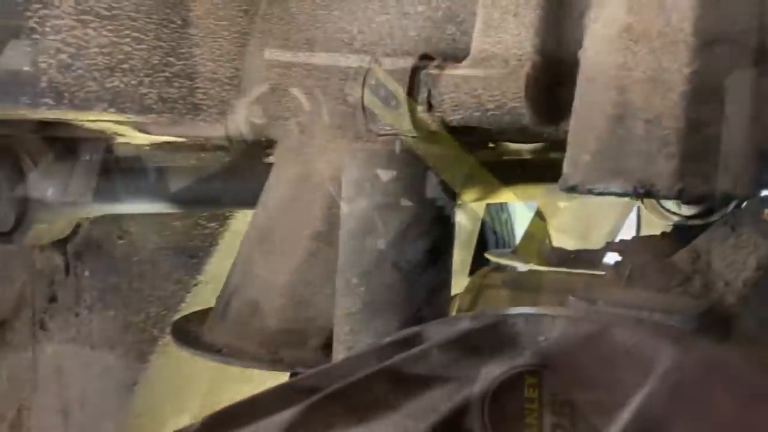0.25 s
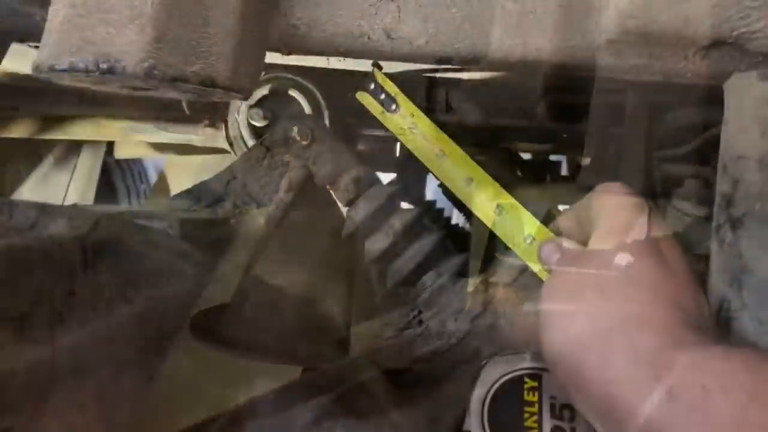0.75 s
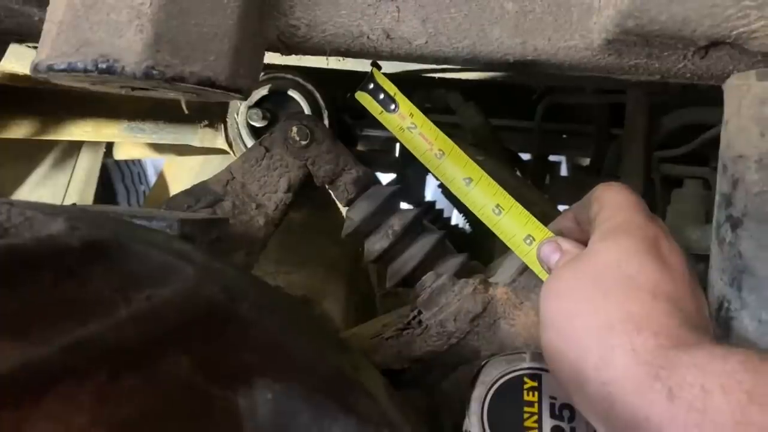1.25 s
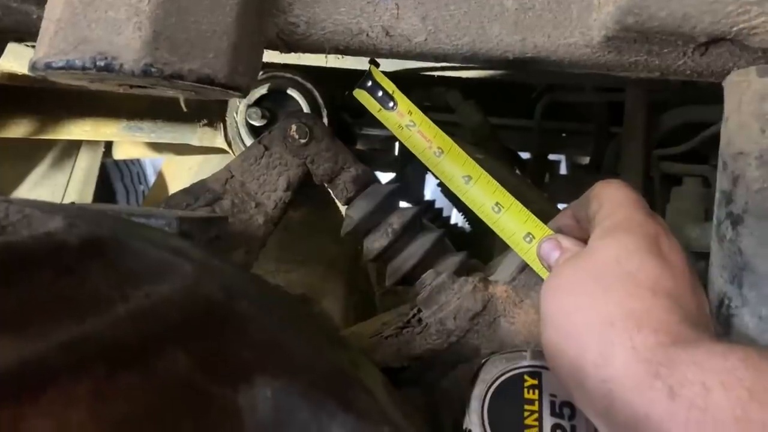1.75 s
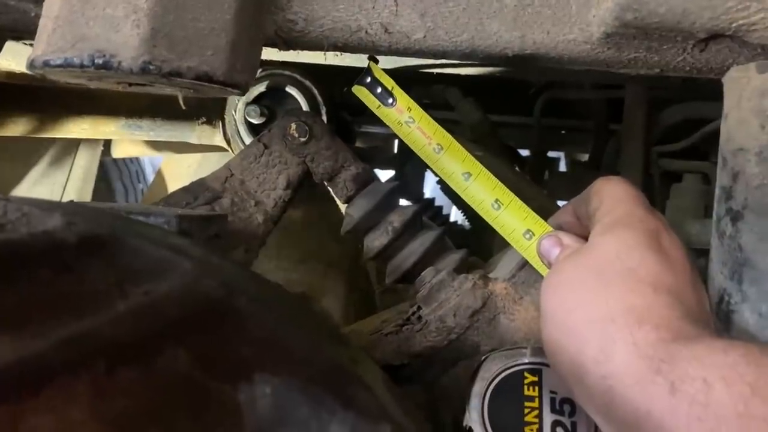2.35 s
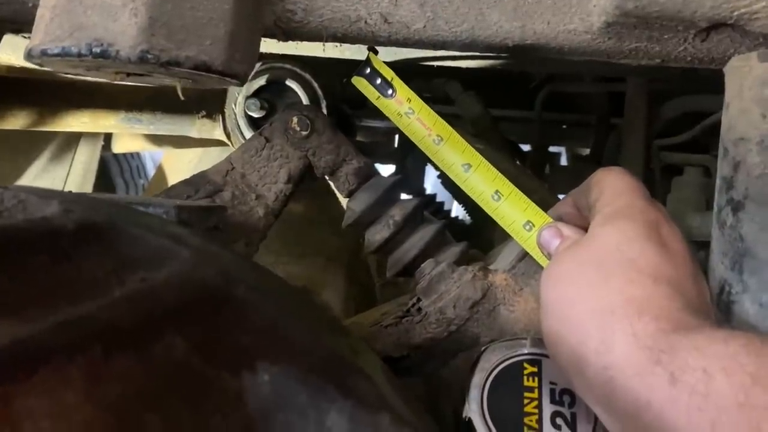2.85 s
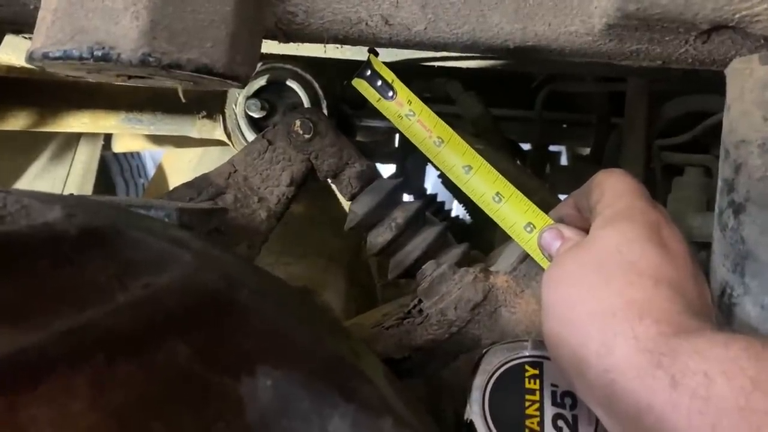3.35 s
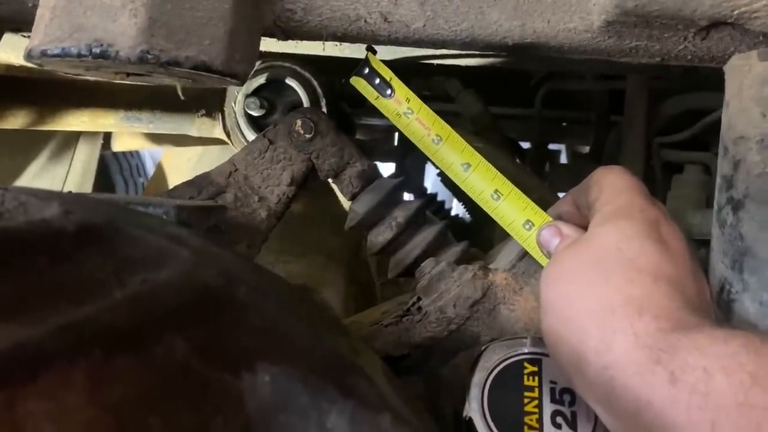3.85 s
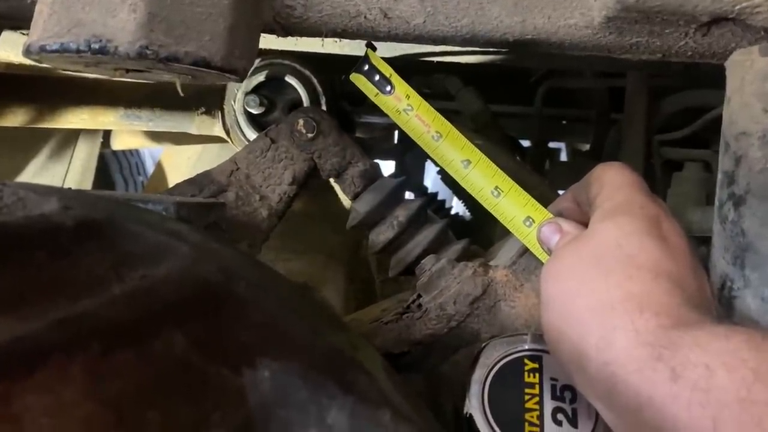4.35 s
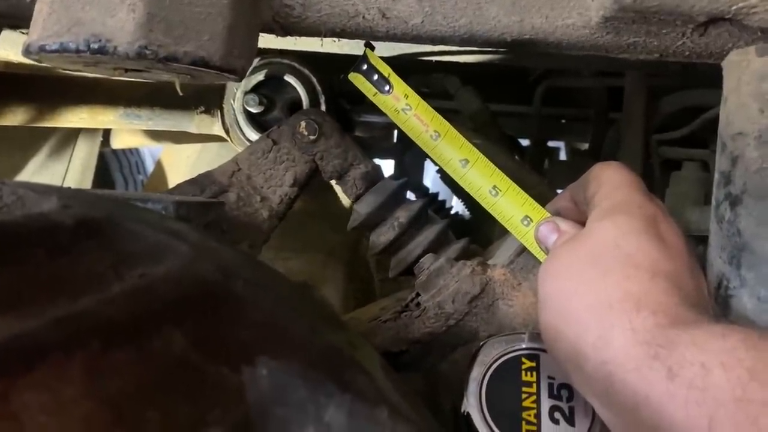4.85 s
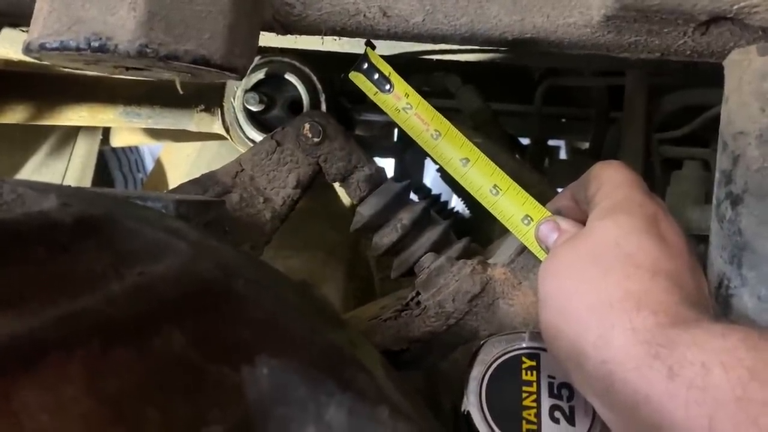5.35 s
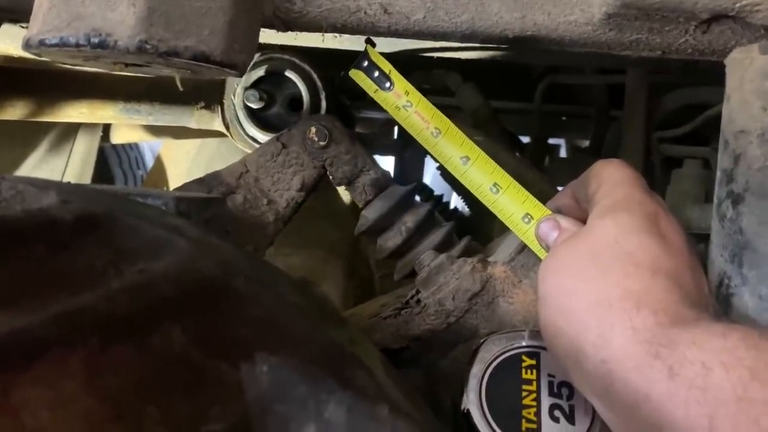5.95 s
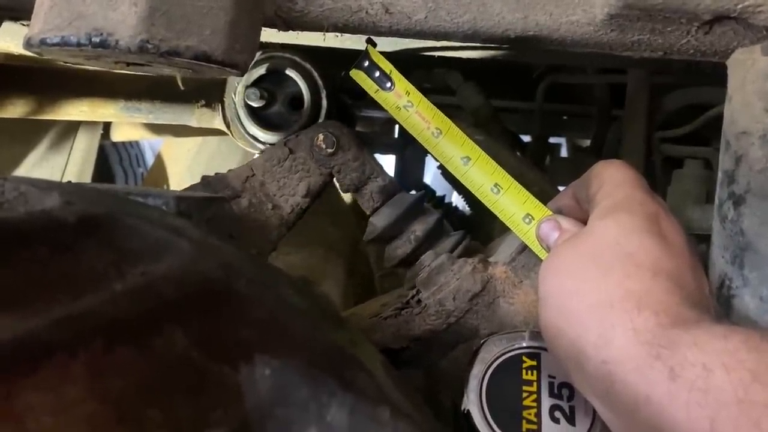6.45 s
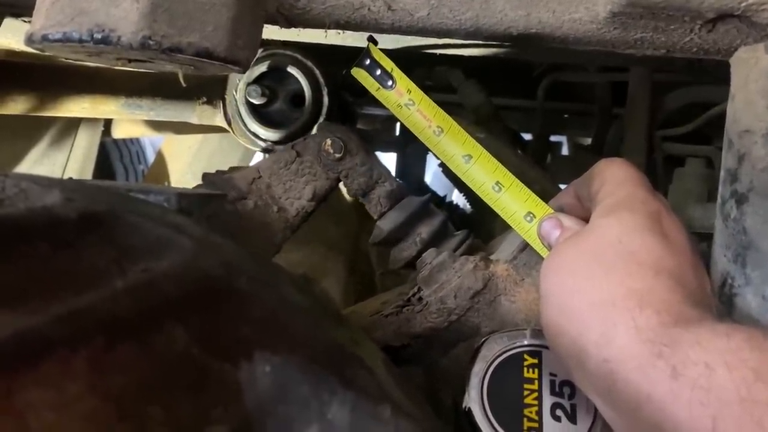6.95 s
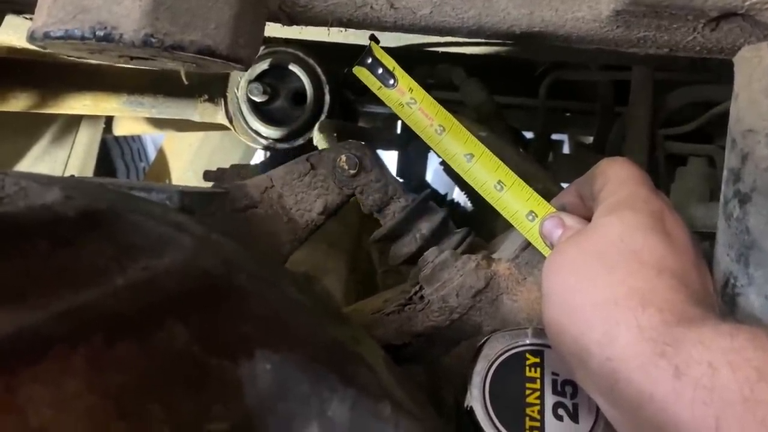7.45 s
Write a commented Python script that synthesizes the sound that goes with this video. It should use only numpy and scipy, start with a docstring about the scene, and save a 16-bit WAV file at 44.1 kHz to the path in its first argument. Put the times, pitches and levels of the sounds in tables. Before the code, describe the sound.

Engine idles with low drone and clatter; a brake air valve clicks open, dumps air in a fierce dulling hiss, puffs once, leaks faintly.

```python
"""Workshop: under an idling vehicle an air valve ticks, opens and dumps its air in a loud hiss.
Shaped noise makes the jet, which dulls as the pressure falls; a low rumble buffets the microphone,
a last puff escapes and a thin leak remains. Exhaust orders and cyclic knocks make the engine.
A gain control ducks under the blast and slowly brings the engine back."""
import sys
import numpy as np
from scipy import signal
from scipy.fft import rfft, irfft, next_fast_len
from scipy.io import wavfile
from scipy.ndimage import map_coordinates

SR = 44100
rng = np.random.default_rng(int(sys.argv[2]) if len(sys.argv) > 2 else 0)


def master_out(mix):
    """Clip the mix to full scale and print it as 16-bit PCM to the path in sys.argv[1]."""
    frames = np.transpose(np.atleast_2d(mix))
    ceiling = np.clip(frames, -1, 1)
    pcm = np.round(ceiling * 32767).astype(np.int16)
    wavfile.write(sys.argv[1], SR, pcm)


N = 339129
TIME = np.arange(N) / SR


def amp(db):
    """Decibels to gain."""
    return 10 ** (np.asarray(db) / 20)


def unit(x):
    """Scale to rms 1."""
    return x / np.sqrt(np.mean(x ** 2) + 1e-20)


def along(points, hz):
    """(hz, value) points joined on a log axis."""
    point_hz, value = np.transpose(points)
    return np.interp(np.log(hz + 1), np.log(point_hz + 1), value)


def curves(rows, t=TIME):
    """Each column after the time, read at the times t."""
    time_s, *columns = np.transpose(rows)
    return [np.interp(t, time_s, column) for column in columns]


def wobble(rate_hz):
    """A smooth random curve with rate_hz knots a second."""
    knots = rng.standard_normal(int(N * rate_hz / SR) + 4)
    return map_coordinates(knots, [TIME * rate_hz])


def filtered(x, response):
    """x times a response of frequency."""
    size = next_fast_len(N + 8192)
    spectrum = rfft(x, size) * response(np.fft.rfftfreq(size, 1 / SR))
    return irfft(spectrum, size)[..., :N]


def coloured(x, spectrum):
    """x with the given (hz, db) colour, at rms 1."""
    return unit(filtered(x, lambda hz: amp(along(spectrum, hz))))


def noise():
    """Fresh white noise."""
    return rng.standard_normal(N)


def lift(resonances, hz):
    """The dB that Gaussian (centre_hz, half_width_hz, lift_db) resonances add."""
    return sum(db * np.exp(-((hz - centre) / width) ** 2) for centre, width, db in resonances)


def since(start_s, t=TIME):
    """Seconds gone by since start_s, zero before it."""
    return np.maximum(t - start_s, 0)


def swell(full_s, end_s, rise_db, sag_db, fall_db):
    """Envelope in dB: rises until full_s, sags, falls further from end_s; slopes in dB per second."""
    return -rise_db * np.maximum(full_s - TIME, 0) - sag_db * since(full_s) - fall_db * since(end_s)


def chassis(x, t60_s, wet_db):
    """Dense reflections from frame and floor comb the sound and give it a short tail."""
    t = np.arange(SR // 4) / SR
    tail = rng.standard_normal(len(t)) * amp(-60 * t / t60_s) * (t > .002)
    return x + amp(wet_db) * signal.fftconvolve(x, tail / np.linalg.norm(tail))[:N]


# room background colour: hz, relative_db
ROOM_COLOUR = [(25, -32), (45, -16), (75, -8), (110, 3), (220, -13), (500, -15), (1000, -12), (4000, -17.5),
               (12000, -46), (16000, -62)]


def workshop(room_db, hum_db):
    """Room rumble and a 120 Hz mains hum that beats against the engine."""
    hum = np.sin(2 * np.pi * 120 * TIME)
    return amp(room_db) * coloured(noise(), ROOM_COLOUR) + amp(hum_db) * unit(hum)


CYCLE_HZ = 28.55  # mean engine cycle rate
# engine level: time_s, exhaust_db, clatter_db
IDLE_LEVELS = [(0, -33, -37), (.3, -35, -40.5), (.55, -37.5, -42.5), (1, -34.5, -39), (1.5, -34, -38.5),
               (2.1, -33.5, -37), (3.5, -35, -36), (5.5, -33.5, -38.5), (7.69, -32, -37.5)]
# exhaust harmonics of the cycle: order, relative_db
EXHAUST_ORDERS = [(1, -38), (2, 0.5), (3, -20.5), (4, -14.5), (5, -20), (6, -13), (7, -29), (8, -23.5),
                  (9, -32), (10, -27), (11, -23), (12, -8.5), (13, -20), (14, -11.5), (15, -11), (16, -14),
                  (17, -21.5), (18, -13), (19, -15.5), (20, -15.5), (21, -18.5), (22, -34), (23, -28),
                  (24, -24.5)]
# mechanical clatter colour: hz, relative_db
CLATTER_COLOUR = [(400, -12.5), (650, -5.5), (800, -12.5), (1100, -2), (1500, -3.5), (2000, -4), (2800, -6),
                  (4300, -13), (5400, -20), (8000, -21), (13000, -22.5), (15500, -33)]
# ringing of engine block and covers: centre_hz, half_width_hz, lift_db
BLOCK_MODES = [(993, 24, 9), (1101, 22, 8.5), (1447, 32, 8), (1604, 16, 7.5), (2460, 79, 8), (3330, 160, 5),
               (4250, 200, 2.5), (6470, 620, 4.5), (10200, 250, 4.5)]


def engine(waver_db, loose_db, throb, smear):
    """Two firings a cycle: low exhaust orders, and clatter that partly repeats with every turn."""
    turns = np.cumsum(CYCLE_HZ * (1 + 0.00078 * wobble(5))) / SR
    exhaust_db, clatter_db = curves(IDLE_LEVELS)
    drone = 0
    for order, db in EXHAUST_ORDERS:
        steadiness = .3 if order == 2 else 1  # firing order wavers least
        # silencer and walls smear each pulse into a ragged falling sweep
        lead = smear * order ** 2 + rng.normal(0, 0.12)
        level = amp(db + steadiness * waver_db * wobble(7))
        drone = drone + level * np.sin(2 * np.pi * (order * turns + lead))
    # same knocks each cycle, loose rattle on top
    size = round(SR / CYCLE_HZ / 2)
    one_turn = unit(irfft(np.exp(2j * np.pi * rng.random(size))))
    knocks = map_coordinates(one_turn, [turns % 1 * len(one_turn)], mode="grid-wrap")
    knocks = filtered(knocks, lambda hz: 1 / (1 + (hz / 2000) ** 4))
    firing = 1 + throb * np.cos(2 * np.pi * 2 * turns)
    blows = (knocks + amp(loose_db) * noise()) * firing
    clatter = filtered(blows, lambda hz: amp(along(CLATTER_COLOUR, hz) + lift(BLOCK_MODES, hz)))
    return amp(exhaust_db) * unit(drone) + amp(clatter_db) * unit(clatter)


# valve tick: start_s, level_db
TICK_EVENT = (1.9218, -30.3)
# steel valve modes: pitch_hz, relative_db, t60_s
VALVE_MODES = [(6487, -2, 0.042), (6900, 7, 0.04), (7784, -15, 0.061), (11000, -12, 0.05),
               (11700, -7, 0.051), (14840, -20, 0.045)]


def tick(crack_db, crack_t60_s):
    """The valve unseats: a sharp crack and a brief steel ring."""
    start_s, level_db = TICK_EVENT
    t = since(start_s)
    ring = sum(amp(db - 60 * t / t60_s) * np.sin(2 * np.pi * hz * t) for hz, db, t60_s in VALVE_MODES)
    crack = coloured(noise(), [(3500, -30), (5200, -8), (7000, 8.5), (8500, -6), (12500, -11), (16000, -26)])
    onset = 1 - np.exp(-t / 0.00049)
    blow = (ring + crack * amp(crack_db - 60 * t / crack_t60_s)) * onset
    return chassis(amp(level_db) * blow, t60_s=0.073, wet_db=-14)


# moving-air rumble colour: hz, relative_db
BUFFET_COLOUR = [(30, -25), (80, -15), (180, -1.5), (260, -12), (550, -8), (800, -16.5), (1300, -27),
                 (3000, -26)]
# gusts thumping the microphone: time_s, level_db
THUMP_EVENTS = [(4.345, -31), (4.54, -35), (4.67, -36), (4.708, -32), (4.832, -32.5), (4.898, -32)]
# thump colour: hz, relative_db
THUD_COLOUR = [(40, -20), (90, -3), (170, -1), (260, -12), (500, -17), (1200, -45)]


def draught(level_db):
    """The vented air reaches the microphone as a soft, fluttering rumble with a few low thumps."""
    flutter_db = 1.5 * wobble(40)
    passing_db = swell(full_s=4.33, end_s=4.9, rise_db=64, sag_db=15.5, fall_db=100)
    rumble = unit(amp(flutter_db) * coloured(noise(), BUFFET_COLOUR))
    gusts = sum(amp(db) * np.exp(-((TIME - time_s) / 0.01) ** 2) for time_s, db in THUMP_EVENTS)
    return amp(level_db + passing_db) * rumble + gusts * coloured(noise(), THUD_COLOUR)


OPEN_S, SNAP_S = 2.103, .0055  # valve half open; snap time constant


def opening():
    """How far the valve has snapped open, 0 to 1."""
    return .5 + .5 * np.tanh((TIME - OPEN_S) / (2 * SNAP_S))


LEAK_FULL_S, LEAK_DB, LEAK_RISE_DB_PER_S, LEAK_CREEP_DB_PER_S = 4.9, -44, 10, 3
# pinhole hiss colour: hz, relative_db
LEAK_COLOUR = [(5000, -19), (8600, -9), (9200, -6), (9700, -4), (10250, -4.5), (10900, -11), (13000, -11),
               (16000, -22)]


def leak():
    """The last air seeps through a pinhole: a thin hiss grows in, then creeps up."""
    rise_db = LEAK_RISE_DB_PER_S * np.maximum(LEAK_FULL_S - TIME, 0)
    level_db = LEAK_DB - rise_db + LEAK_CREEP_DB_PER_S * since(LEAK_FULL_S)
    hiss = coloured(chassis(noise(), t60_s=0.066, wet_db=-3), LEAK_COLOUR)
    return opening() * amp(level_db) * hiss


# pipe's low resonances: hz, relative_db
PIPE_COLOUR = [(1200, -26), (1650, -4.5), (1870, 6.5), (2050, -4), (2280, 2), (2500, 0), (2900, -7),
               (3700, -7), (4600, -38), (8000, -50)]
# pipe whistle: centre_hz, half_width_hz, lift_db
WHISTLE_MODES = [(4600, 71, 14)]


def rush(level_db):
    """As the pressure runs out, slower air sounds the pipe's low resonances and a faint whistle."""
    hollow = filtered(noise(), lambda hz: amp(along(PIPE_COLOUR, hz) + lift(WHISTLE_MODES, hz)))
    passing_db = swell(full_s=5.4, end_s=7.14, rise_db=22, sag_db=2.1, fall_db=28)
    return amp(level_db + passing_db) * unit(hollow)


# broad jet colour: hz, relative_db
JET_COLOUR = [(300, -32.5), (700, -22.5), (900, -17), (1400, -13), (1900, -4), (3000, 1.5), (5200, -3.5),
              (6200, 7), (7500, 3), (10000, -5), (12000, 3.5), (14000, -3.5), (15600, -9.5)]
# exhaust port and chassis peaks and notches: centre_hz, half_width_hz, lift_db
PORT_MODES = [(1497, 80, -5.7), (1673, 30, -3.9), (2029, 82, -8.8), (2199, 48, -3.7), (2323, 30, -9.0),
              (2411, 64, -4.8), (2565, 36, -7.3), (2746, 30, 5.7), (2813, 251, -8.8), (2986, 55, -9.0),
              (3266, 92, -8.6), (3509, 125, -5.0), (3832, 49, -6.0), (4445, 450, -6.3), (4612, 108, 10.0),
              (5383, 104, -6.8), (5586, 33, -6.7), (5744, 90, -4.7), (6381, 371, -6.6), (6577, 39, -4.2),
              (7667, 92, -5.3), (7875, 132, 4.9), (7943, 55, -7.7), (8379, 39, -4.5), (9364, 272, 3.0),
              (10104, 44, 3.5), (11020, 49, 4.9), (11397, 42, -3.7), (11504, 57, 3.6), (11857, 116, 4.6)]


def port_air(tilt):
    """Turbulence ringing the port, brightened by tilt(t) dB per kHz, with a slight sputter."""
    air = chassis(noise(), t60_s=.16, wet_db=-11)
    air = unit(filtered(air, lambda hz: amp(along(JET_COLOUR, hz) + lift(PORT_MODES, hz))))
    hz, t, bins = signal.stft(air, SR, nperseg=256)
    khz_above_centre = (hz[:, None] - 7000) / 1000
    air = signal.istft(bins * amp(tilt(t) * khz_above_centre), SR, nperseg=256)[1][:N]
    return air * amp(0.33 * wobble(25) + 0.33 * wobble(250))


PUFF_S, PUFF_SCALE_S, PUFF_DB, PUFF_TILT_DB_PER_KHZ = 6.862, 0.051, -23.5, -1.1


def puff():
    """A last soft, dull puff swells and dies in the same port."""
    swelling = 1 / np.cosh((TIME - PUFF_S) / PUFF_SCALE_S)
    return amp(PUFF_DB) * swelling * port_air(lambda t: PUFF_TILT_DB_PER_KHZ)


WEEP_S, WEEP_DB = 2.05, -45  # seat weeps just before opening
SHRIEK_DB, SHRIEK_END_S, SHRIEK_FALL_DB_PER_S = -18, 2.5, 62
NARROW_HZ, WIDE_HZ, SINK_S = 7450, 6160, .11  # gap pitches; glide time constant


def seat(width_hz):
    """The narrow gap shrieks in a band of noise that sinks as the valve opens."""
    weep = amp(WEEP_DB + swell(WEEP_S, OPEN_S, rise_db=900, sag_db=0, fall_db=200))
    shriek = opening() * amp(SHRIEK_DB - SHRIEK_FALL_DB_PER_S * since(SHRIEK_END_S))
    centre_hz = WIDE_HZ + (NARROW_HZ - WIDE_HZ) * np.exp(-since(OPEN_S - 2 * SNAP_S) / SINK_S)
    carrier = np.sin(2 * np.pi * np.cumsum(centre_hz) / SR)
    band = unit(filtered(noise(), lambda hz: 1 / (1 + (hz / width_hz) ** 4)))
    return (weep + shriek) * unit(band * carrier)


TRAVEL_DB, TRAVEL_S = 5.5, 0.14  # remaining valve travel after the snap
SETTLE_S, SETTLE_DB, DRAIN_DB_PER_S = 2.734, 1.7, 5.5  # valve settles, tank drains
UNCHOKE_S, SPENT_DB_PER_S = 5.12, 3  # extra fade once no longer choked


def flow():
    """Flow strength, 1 at full blast: sudden opening, short hold, long fade with the pressure."""
    travel_db = TRAVEL_DB * np.exp(-since(OPEN_S) / TRAVEL_S)
    settle_db = SETTLE_DB * (.5 + .5 * np.tanh((TIME - SETTLE_S) / 0.025))
    drain_db = DRAIN_DB_PER_S * since(SETTLE_S) + SPENT_DB_PER_S * since(UNCHOKE_S)
    return opening() * amp(-travel_db - settle_db - drain_db)


DULL_S, DULL_OVER_S = 3.5, 2.2
OPEN_DB_PER_KHZ, KEEN_DB_PER_KHZ, SPENT_DB_PER_KHZ = -0.17, 0.29, -0.74


def jet_tilt(t):
    """The jet sharpens until the valve settles, and dulls once the pressure is low."""
    time_s = [OPEN_S, SETTLE_S, DULL_S, DULL_S + DULL_OVER_S]
    tilt = [OPEN_DB_PER_KHZ, KEEN_DB_PER_KHZ, KEEN_DB_PER_KHZ, SPENT_DB_PER_KHZ]
    return np.interp(t, time_s, tilt)


BLAST_DB, FIZZ_DB, FIZZ_POWER = -3.5, -9, 2.24  # fizz fades FIZZ_POWER times as fast in dB
# choked jet's fizz colour: hz, relative_db
FIZZ_COLOUR = [(3000, -25.5), (5200, -5), (7500, -12), (8800, 4), (10000, 2), (12500, 0), (14300, 4),
               (15700, -9.5)]


def jet():
    """The main blast roars through the port; only the strongest flow adds a fine fizz on top."""
    strength = flow()
    roar = amp(BLAST_DB) * strength * port_air(jet_tilt)
    fizz = amp(FIZZ_DB) * strength ** FIZZ_POWER * coloured(noise(), FIZZ_COLOUR)
    return roar + fizz


def scene():
    """The room, the engine and the escaping air, all heard at the centre."""
    background = workshop(room_db=-46.5, hum_db=-52)
    idle = engine(waver_db=1.18, loose_db=-4.0, throb=0.065, smear=.058)
    valve = tick(crack_db=16, crack_t60_s=0.018)
    air = leak() + draught(level_db=-30) + rush(level_db=-35.8) + puff() + seat(width_hz=480) + jet()
    mid = background + idle + valve + air
    return np.array([mid, mid])


def gain_control(x, threshold_db, attack_s, release_db_per_s):
    """The gain sinks while the output is over the threshold, and creeps back at a steady rate."""
    size = 220  # samples per level reading
    power = np.mean(x[:, :N // size * size].reshape(2, -1, size) ** 2, axis=(0, 2))
    cut_db, cuts_db = 0, []
    for level_db in 10 * np.log10(power + 1e-12):
        excess_db = max(level_db - cut_db - threshold_db, 0)
        cut_db = max(cut_db + (excess_db / attack_s - release_db_per_s) * size / SR, 0)
        cuts_db.append(cut_db)
    centres = (np.arange(len(cuts_db)) + .5) * size
    return x * amp(-np.interp(np.arange(N), centres, cuts_db))


TOP_HZ = 15800


def record(dry):
    """Gain control, soft rounding of the highest peaks, then a sharp band limit."""
    held = gain_control(dry, threshold_db=-17.5, attack_s=0.073, release_db_per_s=1.1)
    rounded = held / (1 + np.abs(held / .88) ** 8) ** (1 / 8)
    return filtered(rounded, lambda hz: hz < TOP_HZ)


dry = scene()
out = record(dry)
master_out(out)
```